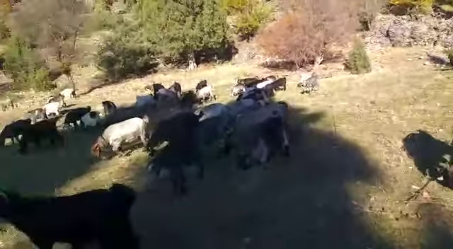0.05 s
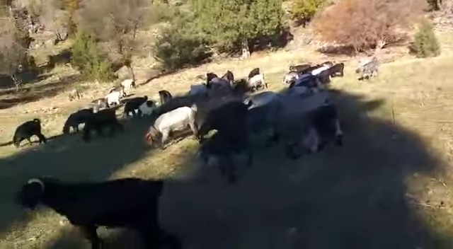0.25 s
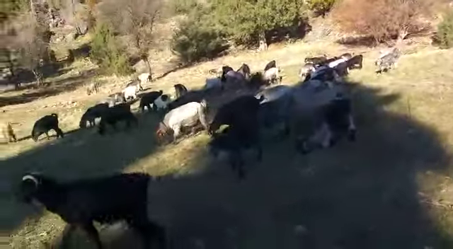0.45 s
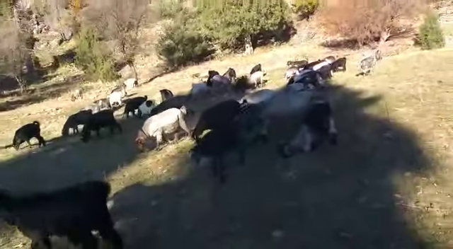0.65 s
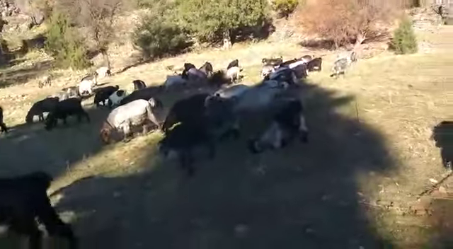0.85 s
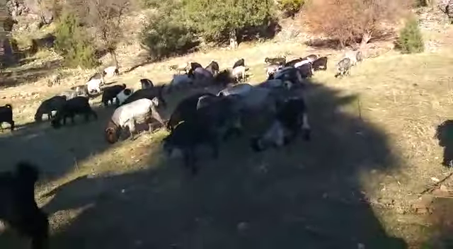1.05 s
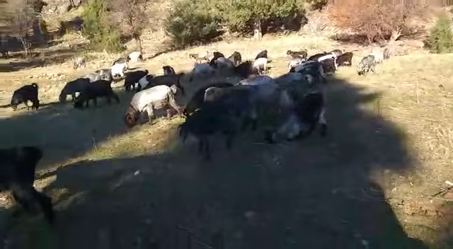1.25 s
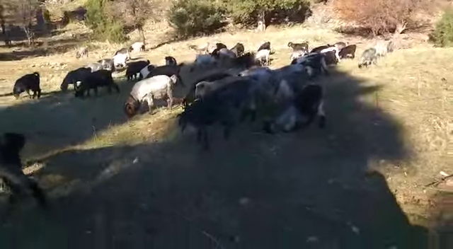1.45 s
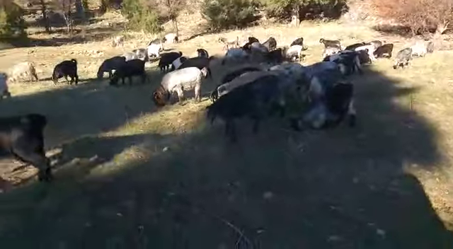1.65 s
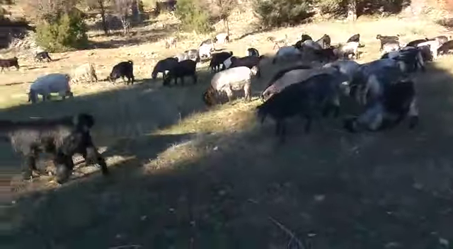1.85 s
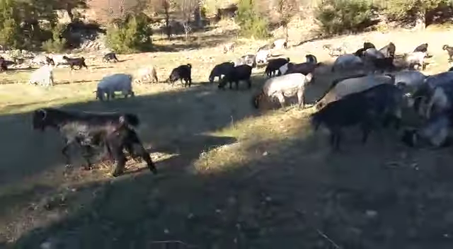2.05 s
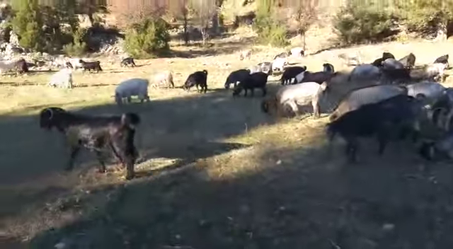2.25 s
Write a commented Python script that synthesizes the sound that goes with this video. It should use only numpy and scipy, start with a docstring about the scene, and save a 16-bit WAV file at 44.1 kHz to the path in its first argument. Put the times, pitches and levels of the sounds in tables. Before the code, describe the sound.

Goat bells clank and tinkle unevenly, one close by, with faint hooves in dry grass.

```python
"""Goat bells on an open hillside.

Close to the microphone a grazing goat wears a sheet-metal bell. Its clapper clanks irregularly, each
blow waking the twin modes differently, and the wire hanger jingles in between. Farther off, other bells
clonk and tinkle and hooves scuff and crackle in dry grass, over a faint low rumble. Almost mono."""
import sys
import numpy as np
from scipy import signal
from scipy.fft import rfft, irfft
from scipy.io import wavfile

SR = 44100
rng = np.random.default_rng(int(sys.argv[2]) if len(sys.argv) > 2 else 0)


def wav_record(signal):
    """Record a signal, one row per channel, as 16-bit PCM in the file named by sys.argv[1]."""
    frames = np.transpose(np.atleast_2d(signal))
    bounded = np.clip(frames, -1, 1)
    # unit amplitude maps onto the largest positive 16-bit level
    quanta = np.round(bounded * 32767).astype(np.int16)
    wavfile.write(sys.argv[1], SR, quanta)


N = 105840
TOP_HZ, CLONK_RISE_S = 15900, 0.0077


def undb(db):
    """Decibels to gain."""
    return 10 ** (np.asarray(db) / 20)


def clock():
    """Time of every sample in seconds."""
    return np.arange(N) / SR


def unit(x):
    """Scale to rms 1."""
    return x / np.sqrt(np.mean(x ** 2) + 1e-20)


def decay(age, t60_s):
    """A fade that loses 60 dB in t60_s."""
    return np.exp(-np.log(1000) * age / t60_s)


def colour(x, curve):
    """Filter by a curve of (freq_hz, gain_db) points, then scale to rms 1."""
    hz, db = np.array(curve, float).T
    bins_hz = np.maximum(np.arange(N // 2 + 1) * SR / N, 1)
    gain = undb(np.interp(np.log(bins_hz), np.log(hz), db))
    return unit(irfft(rfft(x) * gain, N))


def noise(curve):
    """Steady coloured noise at rms 1."""
    return colour(rng.standard_normal(N), curve)


def drift(per_s):
    """Smooth random drift, spread near 1."""
    knots = rng.standard_normal(256)
    return np.interp(clock() * per_s, np.arange(len(knots)), knots)


def grains(per_s, spread_db):
    """Random clicks of uneven size."""
    size = undb(spread_db * np.minimum(rng.exponential(size=N), 4))
    return (rng.random(N) < per_s / SR) * size * np.sign(rng.standard_normal(N))


def swells(rows):
    """A rounded swell for each row of start_s, length_s, level_db."""
    out = np.zeros(N)
    for start, length, db in rows:
        progress = np.clip((clock() - start) / length, 0, 1)
        out += undb(db) * np.sqrt(np.abs(np.sin(np.pi * progress)))
    return out


def bursts(times, dbs, decay_s):
    """A sudden, quickly fading envelope at each time."""
    out = np.zeros(N)
    for start, db in zip(times, dbs):
        first = int(start * SR)
        out[first:] += undb(db) * np.exp(-clock()[:N - first] / decay_s)
    return out


def mode(hz, times, dbs, t60s, rise_s=0.0007):
    """One mode of a swinging bell; each blow tops up its energy, which then drains away."""
    sway_hz, flutter = 3.08, 0.1  # swinging bends the tone; the loose clapper roughens it
    energy = np.zeros(N)
    for start, db, t60 in np.broadcast(times, dbs, t60s):
        first = int(start * SR)
        age = clock()[:min(int(t60 * SR), N - first)]
        envelope = undb(db) * (1 - np.exp(-age / rise_s)) * decay(age, t60)
        energy[first:first + len(age)] += envelope ** 2
    cycles = rng.random() + np.cumsum(hz + sway_hz * drift(per_s=14.35)) / SR
    return np.sqrt(energy) * (1 + flutter * drift(per_s=70)) * np.sin(2 * np.pi * cycles)


def cluster(hz, spread_hz, t60_s):
    """The ring of 14 modes scattered round one pitch."""
    age = clock()[:SR // 3]
    pitches = np.clip(hz + spread_hz * rng.standard_normal(14), 100, TOP_HZ)
    return unit(np.sin(2 * np.pi * pitches[:, None] * age).sum(axis=0)) * decay(age, t60_s)


def close_bell():
    """By the microphone, a clapper cracks on sheet metal and rings the wall and the air inside."""
    # clapper blows: start_s, ring_factor, body_db, shimmer_db, then per pair level_db, upper_lean_db
    blows = [ (.0, 1.1, -76, -86, -57, -4, -56, -20, -63, -3, -51, -16),
             (0.2076, 0.74, -32, -40.5, -46.5, 2, -24.5, 19, -20.5, 4, -27.5, 26),
             (0.2469, .9, -25, -46, -41.5, 17, -26, 28, -17, -18, -28.5, 3),
             (.429, 1.2, -67, -67, -51, 3, -56, -5, -36, 3, -62, 4),
             (0.4517, 0.92, -37.5, -40.5, -44, 15, -33, 2, -22, -10, -39, 12),
             (0.5209, 1.25, -33, -44, -48.5, 4, -36.5, -6.5, -35.5, 0, -39, -4),
             (0.7033, 1.7, -68, -54, -57, -6, -41.5, 26, -42.5, 12, -39.5, 3),
             (.876, 1.02, -42, -44.5, -38, 4.5, -28.5, 5.5, -23, -2.5, -27, -9),
             (1.089, 1.49, -33.5, -40.5, -35.5, -18.5, -30.5, 12, -30.5, -11, -25.5, 2),
             (1.127, 0.88, -49, -52.5, -44, -36, -35.5, 10, -45, 5, -31, 12),
             (1.3313, 0.2, -55, -58, -30.5, 5, -34.5, -4, -27, -3, -42, -2),
             (1.3364, 0.84, -53, -49.5, -31.5, -9, -50, 7, -22.5, -10, -33, 8),
             (1.5642, 1.22, -50, -43.5, -45, -7.5, -37.5, 22, -27, -28, -36, -2),
             (1.657, 1.05, -59.5, -50, -72, 7, -35, 24, -38, 0, -38.5, 15),
             (1.846, 0.96, -47.5, -48.5, -42.5, 33, -37.5, -7, -31, 17, -41, 13),
             (1.9304, 1.11, -43, -48, -44, -10, -35, -25, -27.5, -27, -35, -4),
             (2.1208, 1.58, -47, -48.5, -54.5, 13, -35, 13.5, -50, -9, -37.5, 4)]
    # twin modes of the wall, lowest pair first: lower_hz, upper_hz, base_t60_s
    pairs = [(1909.7, 2018.4, 0.66), (3575, 3709, 0.39), (4763, 4963, 0.18), (5519, 5574, .2)]
    # single modes of the body: pitch_hz, relative_db, t60_s
    body = [(5184, 0, .15), (5982, -6, .18)]
    # short treble modes: pitch_hz, relative_db
    shimmer = [(6352, -10), (6642, -9), (7046, -9), (7186, -3), (7870, -6), (8231, -6), (9307, -8),
               (9533, -2), (9722, -8), (10518, -5), (10987, -3), (11870, -5), (12365, -4), (12666, -5),
               (12919, -2), (13108, -5), (13463, -6), (13878, -2), (14271, -4), (14599, -7), (15207, -5),
               (15552, -6)]
    # spectrum of the toneless clank: freq_hz, gain_db
    clank = [(400, -32), (1300, -22.5), (2300, -9.5), (3000, -16), (4200, 5.5), (5600, 3), (7000, -37),
             (16000, -27)]
    times, ring_factor, body_db, shimmer_db, *pair_columns = np.array(blows, float).T
    pair_dbs, lean_dbs = pair_columns[::2], pair_columns[1::2]
    twins = []
    for (lower_hz, upper_hz, base_t60), pair_db, lean_db in zip(pairs, pair_dbs, lean_dbs):
        lower_db = pair_db - 10 * np.log10(1 + undb(lean_db) ** 2)  # the twins share the energy
        t60s = base_t60 * ring_factor
        lower = mode(lower_hz, times, lower_db, t60s)
        twins.append(lower + mode(upper_hz, times, lower_db + lean_db, t60s))
    out = sum(mode(hz, times, body_db + db, t60) for hz, db, t60 in body)
    for hz, db in shimmer:
        scatter_db = 3.5 * rng.standard_normal(len(times))
        out += mode(hz, times, shimmer_db + db + scatter_db, t60s=0.1, rise_s=0.00035)
    out += mode(757, times, 0.34 * body_db - 31, t60s=0.17, rise_s=0.0066)  # air in the cavity
    out += bursts(times, np.max(pair_dbs, axis=0) - 15.5, decay_s=0.01) * noise(clank)
    crack = bursts(times, shimmer_db - 18, decay_s=0.00095)
    sizzle = bursts(times, shimmer_db - 5.5, decay_s=0.03)
    # spectrum of the clapper's contact: freq_hz, gain_db
    contact = [(300, -12), (1500, 0), (2800, -16), (4500, 0.5), (7000, 7.5), (16000, 8)]
    out += (crack + sizzle) * noise(contact)
    return out + sum(twins[1:]) + twins[0] * undb([[2], [-2]])  # the lowest pair sits a little left


def stir():
    """How busily the herd is shuffling, as a gain."""
    # activity of the herd: time_s, gain_db
    activity = [(0, 6), (.5, 1), (.85, 2.5), (1.05, 4), (1.28, -2.5), (1.5, 3.5), (1.9, 2.5), (2.4, 1.5)]
    times, dbs = np.array(activity, float).T
    return undb(np.interp(clock(), times, dbs))


def grass():
    """Dry stalks crunched by hooves, brushed by legs, and snapping all over the slope."""
    # hoof scuffs and duller leg swishes: start_s, length_s, level_db
    scuffs = [(.0, 0.082, -56.5), (.40, 0.19, -56.5), (1.60, 0.19, -54.5), (1.755, 0.11, -47),
              (1.856, 0.027, -40.5), (1.88, 0.2, -56), (2.12, 0.3, -59.5)]
    swishes = [(.12, 0.49, -62), (1.62, 0.42, -60.5)]
    # spectra of crunched, brushed and snapping stalks: freq_hz, gain_db
    crunch_curve = [(300, -23), (1300, -18.5), (2300, -9.5), (3200, -6), (4600, 1.5), (7500, 1.5),
                    (11000, -9.5), (16000, -10)]
    swish_curve = [(500, -20), (1400, -12), (2250, 3.5), (3000, -18.5), (5000, -13.5), (12000, -45)]
    snap_curve = [(400, -36), (2000, -20), (5000, 1), (9000, -4), (12500, -1.5), (16000, 1)]
    stalks = grains(per_s=600, spread_db=2.8) + 0.082 * rng.standard_normal(N)
    crunch = swells(scuffs) * colour(stalks, crunch_curve)
    swish = swells(swishes) * noise(swish_curve)
    snaps = colour(grains(per_s=240, spread_db=2.6), snap_curve)
    return crunch + swish + undb(-65) * stir() * snaps


def background():
    """Low outdoor rumble, and a soft hiss that follows the herd's shuffling."""
    # spectra of the rumble and the hiss: freq_hz, gain_db
    rumble = [(25, -17), (50, -20), (80, -1), (115, 3.5), (165, -0.5), (240, -10), (400, -23.5), (800, -15),
              (1600, -22.5), (4000, -23)]
    hiss = [(300, 0.5), (1400, -8.5), (2300, 0), (3000, -8), (5000, 6), (9000, -3), (16000, -3.5)]
    return undb(-66) * noise(rumble) + undb(-65) * stir() * noise(hiss)


def far_herd():
    """The most distant bells merge into a low wavering tone."""
    ring = cluster(hz=1011, spread_hz=23.8, t60_s=0.19)
    ring *= 1 - np.exp(-clock()[:len(ring)] / CLONK_RISE_S)
    strokes = grains(per_s=40, spread_db=1)
    return undb(-68.5) * unit(signal.fftconvolve(strokes, ring)[:N])


def far_bells():
    """Large bells far across the slope: only a soft, beating clonk reaches the microphone."""
    # strokes of the large bells: start_s, pitch_hz, level_db, t60_s
    clonks = [(0.027, 1024, -38, 0.1), (0.043, 1265, -53, 0.15), (0.116, 1032, -54, 0.5),
              (.18, 1023, -49, 0.21), (0.206, 1270, -48, 0.11), (0.259, 1314, -54, .2),
              (0.346, 1035, -50, 0.21), (0.447, 998, -45, .18), (.48, 1250, -55, 0.16),
              (0.514, 1040, -41.5, 0.11), (0.573, 1021, -43, 0.092), (0.653, 1040, -58, 0.38),
              (0.799, 1028, -51.5, 0.19), (.877, 1040, -47, 0.15), (.92, 1012, -39.5, 0.13),
              (.962, 1026, -30.5, 0.095), (1.024, 1288, -50.5, 0.23), (1.118, 1026, -42, 0.066),
              (1.236, 1037, -57, 0.095), (1.457, 1024, -49.5, 0.19), (1.566, 1023, -47, 0.22),
              (1.638, 967, -40, 0.077), (1.689, 1032, -44, 0.13), (1.773, 1302, -51.5, 0.19),
              (2.059, 1025, -45.5, 0.35), (2.09, 1019, -43, 0.13), (2.163, 1277, -56.5, 0.21),
              (2.243, 970, -68, 0.062)]
    twin_ratio, twin_db = 0.981, -11.5
    out = np.zeros(N)
    for start, hz, db, t60 in clonks:
        first = int(start * SR)
        age = clock()[:min(N - first, SR // 2)]
        tone = np.sin(2 * np.pi * (hz * age + rng.random()))
        twin = undb(twin_db) * np.sin(2 * np.pi * (hz * twin_ratio * age + rng.random()))
        attack = 1 - np.exp(-(age / CLONK_RISE_S) ** 2)
        out[first:first + len(age)] += undb(db) * (tone + twin) * attack * decay(age, t60)
    return out


def small_bells():
    """Four light bells some way off, each stroke waking their modes in a different balance."""
    # modes of each bell: pitch_hz, relative_db, t60_s
    low_modes = [(2630, 4.5, 0.93), (4620, 2.5, 0.52), (4900, -9, .7)]
    middle_modes = [(3288, -0.5, 0.38), (4647, -1, 0.59), (4874, 12, 0.15), (6500, -7.5, 0.46),
                    (7700, -2, 0.37), (8600, 4, 0.24), (8800, -16, 0.35), (9100, -12, 0.13)]
    high_modes = [(4950, 3, 0.32), (7060, 12, 0.062), (6900, -6, .2), (9100, 9, 0.074)]
    tiny_modes = [(7600, -5, 0.12), (8520, 0.5, 0.17), (8900, 2, .12), (9480, 2.5, 0.098)]
    # clapper strokes on each bell: start_s, level_db
    low_strokes = [(.452, -64.5), (2.244, -56.5)]
    middle_strokes = [(0.035, -53), (.11, -57.5), (0.584, -59), (1.005, -54), (1.309, -63), (1.40, -59),
                      (1.774, -59.5), (1.99, -58)]
    high_strokes = [(.432, -60.5), (0.962, -58), (1.635, -52.5), (2.24, -55)]
    tiny_strokes = [(.075, -61), (.587, -52), (.617, -57), (1.03, -56), (1.308, -54), (1.411, -56),
                    (2.06, -51)]
    out = np.zeros(N)
    for modes, strokes in [(low_modes, low_strokes), (middle_modes, middle_strokes),
                           (high_modes, high_strokes), (tiny_modes, tiny_strokes)]:
        times, stroke_db = np.array(strokes).T
        for hz, db, t60 in modes:
            scatter_db = 2 * rng.standard_normal(len(times))
            out += mode(hz, times, stroke_db + db + scatter_db, t60, rise_s=0.003)
    return out


def hanger():
    """The close bell's wire loop taps in short flurries, ringing a cluster of very high modes."""
    # jingles of the wire: start_s, length_s, level_db
    jingles = [(0.111, 0.017, -50.5), (0.254, 0.044, -42), (0.477, 0.028, -42), (0.569, 0.016, -40),
               (0.908, .045, -43.5), (1.34, 0.043, -51), (1.117, 0.019, -47.5), (1.978, 0.025, -54.5)]
    t60_s = 0.06
    ring_energy = SR * t60_s / (2 * np.log(1000))
    taps = unit(grains(per_s=220, spread_db=2)) / np.sqrt(ring_energy)
    out = np.zeros(N)
    for jingle in jingles:
        ring = cluster(hz=13800, spread_hz=880, t60_s=t60_s)
        out += signal.fftconvolve(taps * swells([jingle]), ring)[:N]
    return out


def hillside(x):
    """Faint diffuse return from trees and rocks."""
    delay_s, return_db = 0.015, -15.5
    age = clock()[:SR]
    tail = rng.standard_normal(SR) * decay(age, t60_s=0.24) * (age > delay_s)
    tail /= np.sqrt(np.sum(tail ** 2))
    return undb(return_db) * signal.fftconvolve(x, tail)[:N]


def scene():
    """One goat at the microphone and the herd beyond, almost in mono."""
    herd = close_bell() + grass() + far_herd() + far_bells() + small_bells() + hanger()
    width = undb(-22.5) * background() * np.array([[1], [-1]])  # opposite polarity left and right
    return herd + hillside(herd.mean(axis=0)) + background() + width


def record(dry):
    """The recorder cuts the top treble steeply."""
    lowpass = signal.ellip(10, 0.2, 70, TOP_HZ, fs=SR, output="sos")
    return signal.sosfilt(lowpass, dry)


dry = scene()
out = record(dry)
wav_record(out)
```